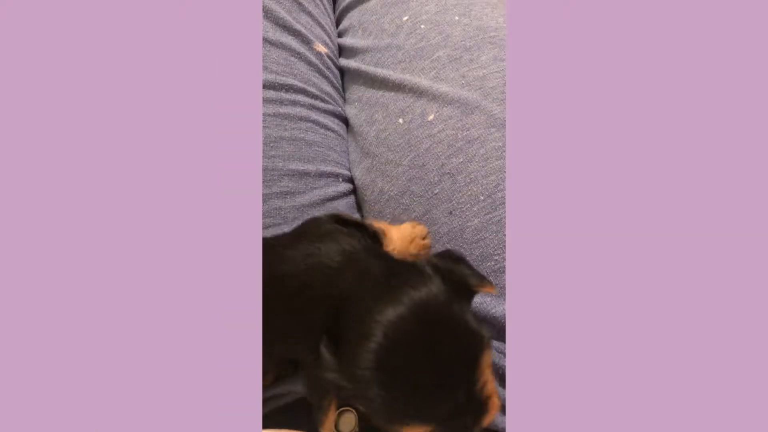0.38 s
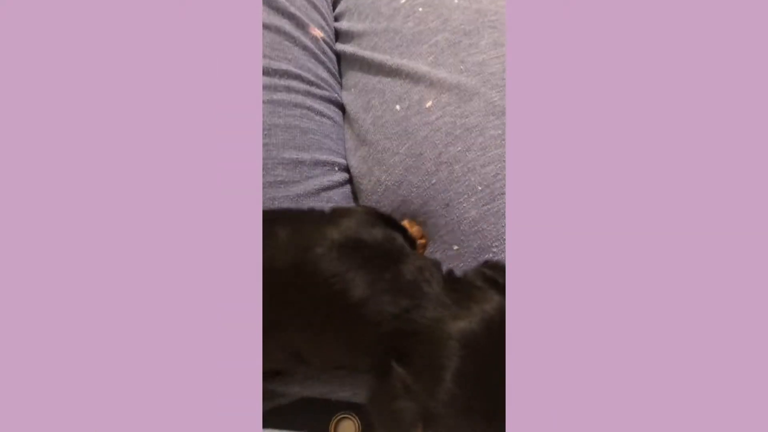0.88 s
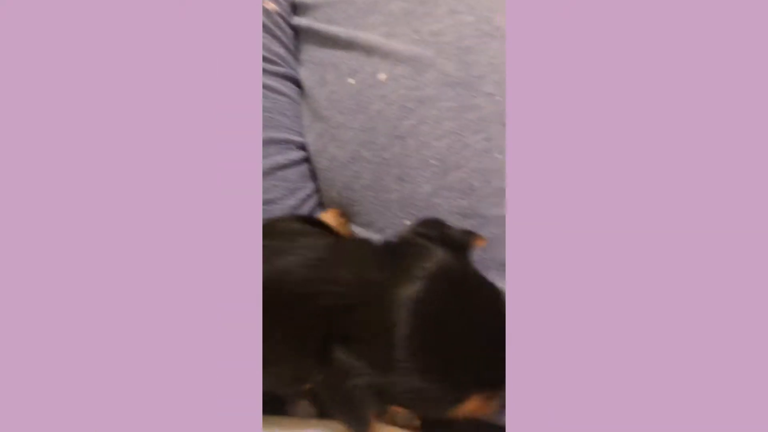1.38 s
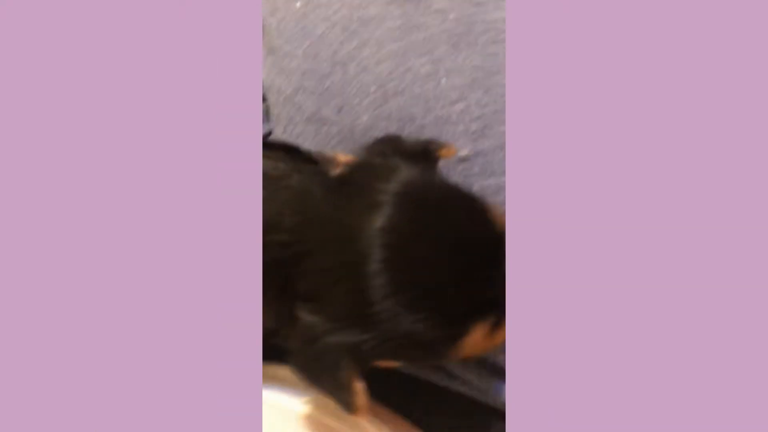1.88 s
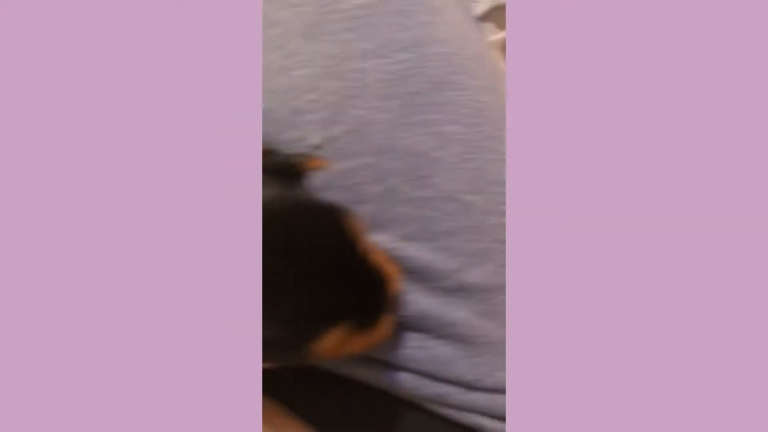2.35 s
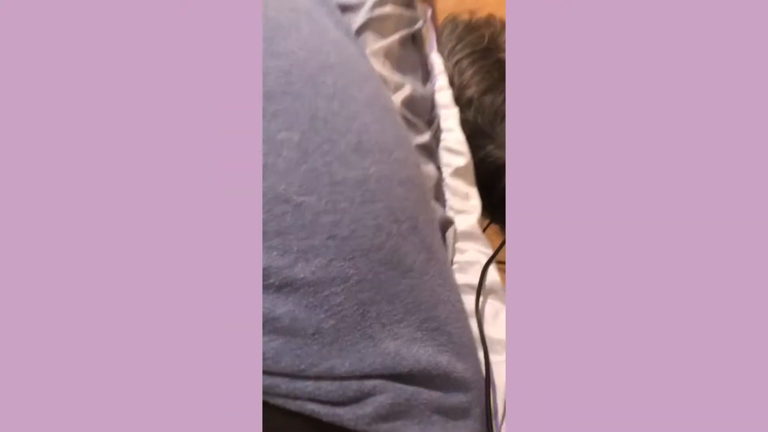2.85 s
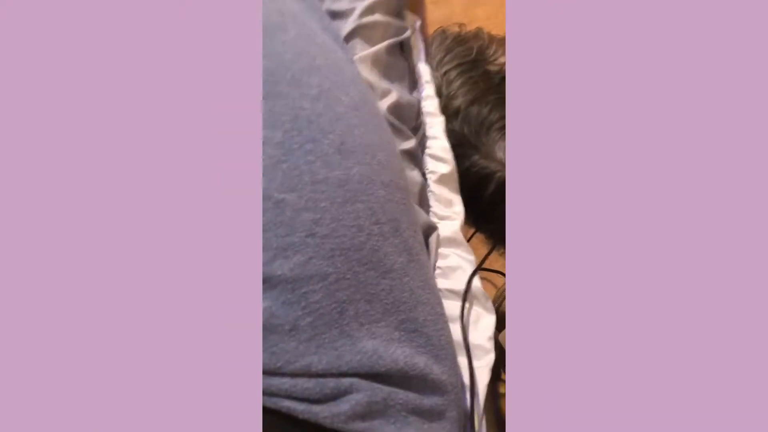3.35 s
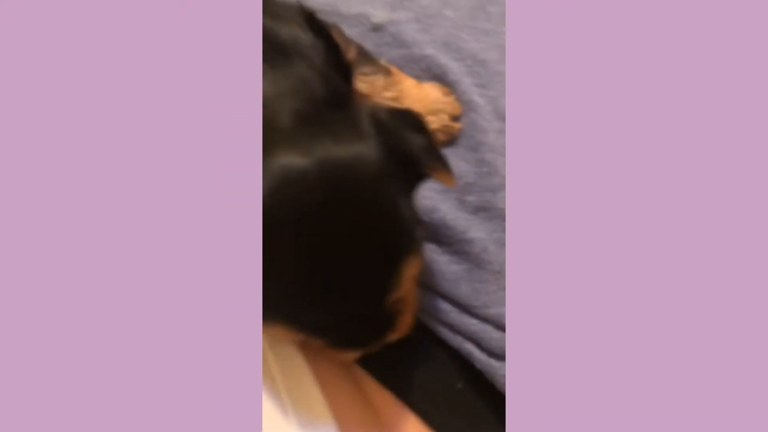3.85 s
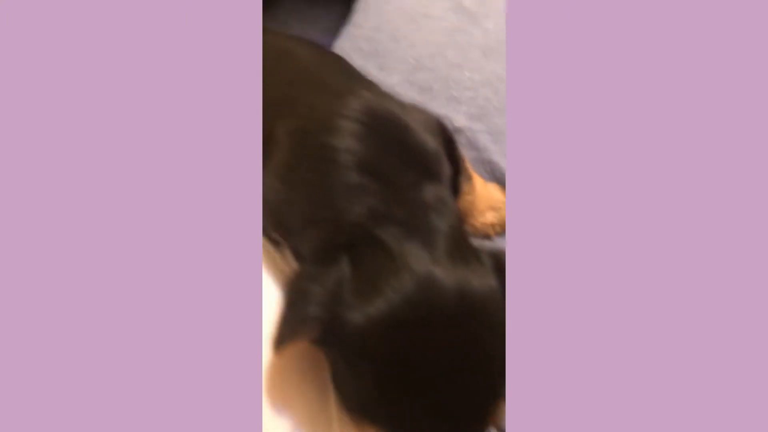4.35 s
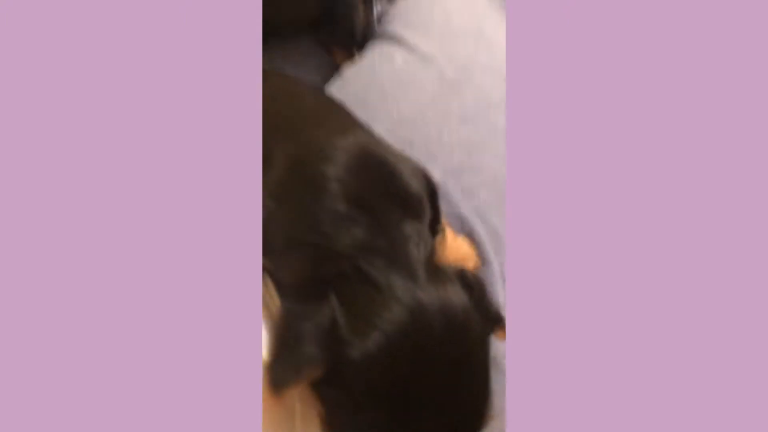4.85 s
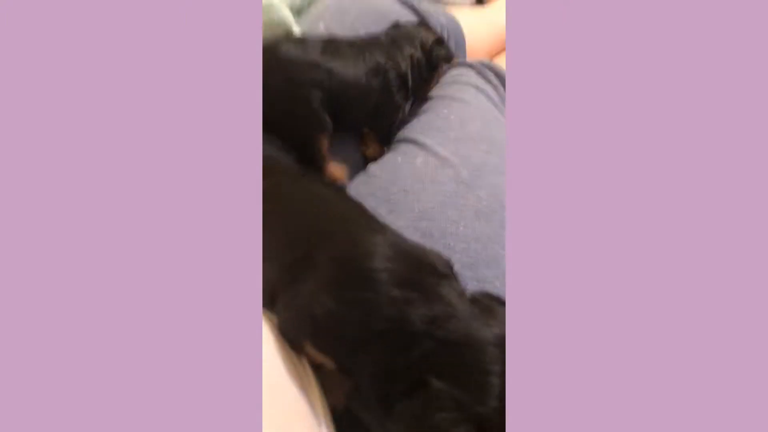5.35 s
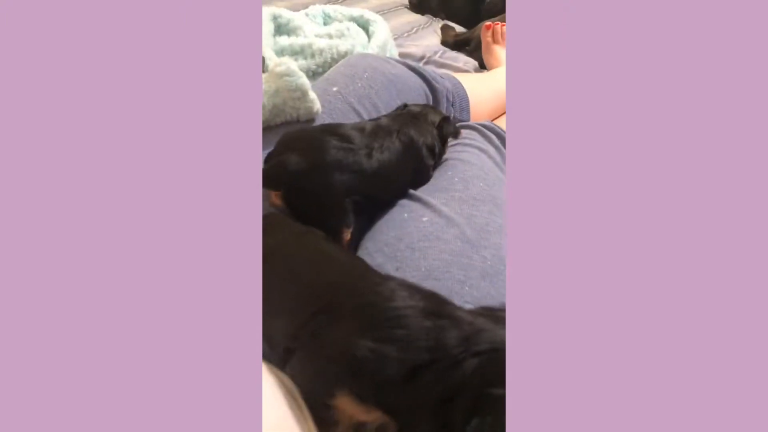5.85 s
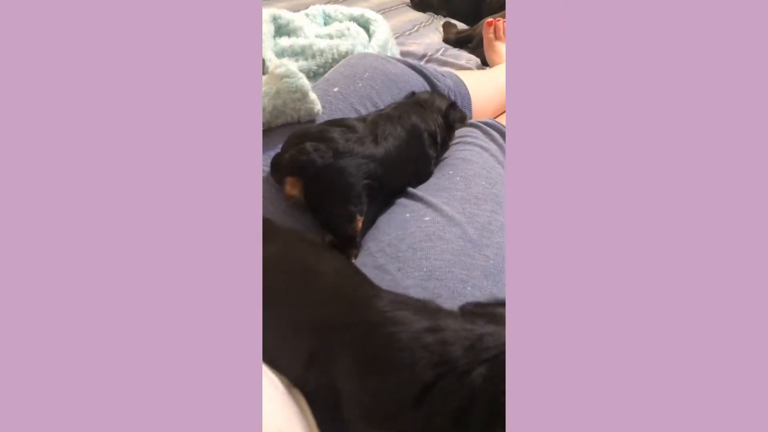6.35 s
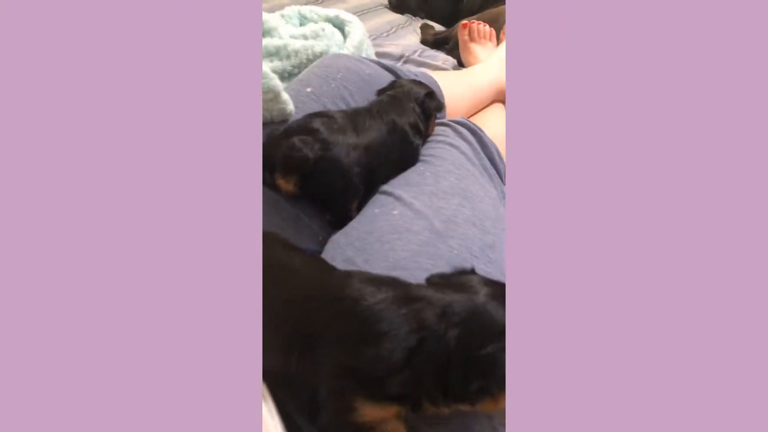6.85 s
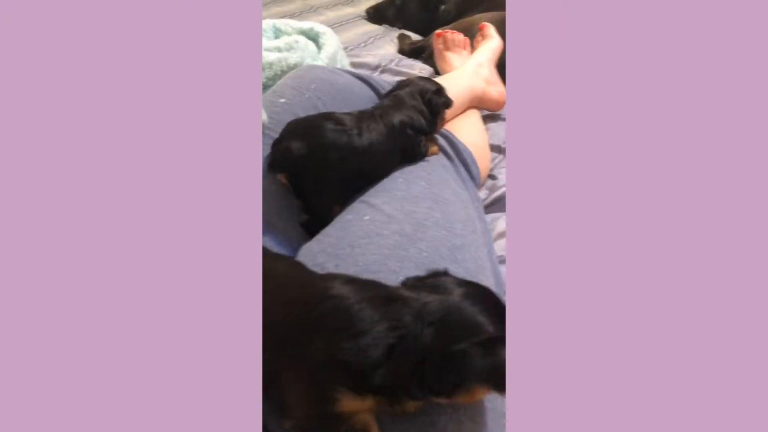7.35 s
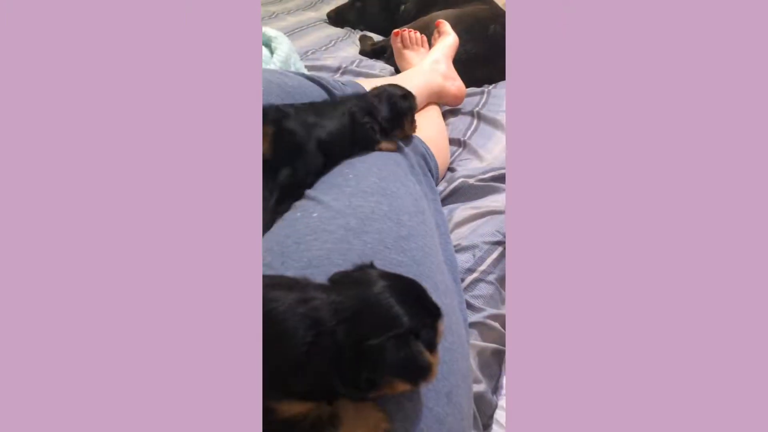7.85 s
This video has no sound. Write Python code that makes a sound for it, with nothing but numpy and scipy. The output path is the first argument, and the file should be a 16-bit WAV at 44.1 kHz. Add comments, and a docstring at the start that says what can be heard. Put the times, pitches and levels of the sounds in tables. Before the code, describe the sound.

In a quiet bedroom, very close to the microphone, a newborn puppy makes short, clear, upward squeaks that get shorter and weaker and stop by about three seconds. Another puppy grunts with each breath, at first small and irregular, then a steady, stronger run of nasal, creaky grunts about three or four a second. Faint cloth rustles, small ticks and a low appliance hum sit beneath.

```python
"""Newborn puppies on a lap

Two puppies in a quiet bedroom, close to the microphone. One grunts with each breath: uneven runs of
throat pulses, with resonant noise for the air in its nose. The other squeaks in clear, mostly rising
harmonic notes. Short gliding tones whistle, shaped noise rustles and ticks like cloth and claws,
and an appliance hums in steady tones over the hiss of the room."""
import sys
import numpy as np
from scipy import signal
from scipy.fft import rfft, irfft, next_fast_len
from scipy.io import wavfile
from scipy.ndimage import map_coordinates

SR = 44100
rng = np.random.default_rng(int(sys.argv[2]) if len(sys.argv) > 2 else 0)


def master(y):
    """Save y as 16-bit WAV."""
    cut = np.clip(np.atleast_2d(y).T, -1, 1)
    pcm = np.round(cut * 32767)  # scale
    wavfile.write(sys.argv[1], SR, pcm.astype(np.int16))


def attenuation_scalar(level_db):
    """Turn a level in dB into a linear amplitude multiplier (20 dB per decade)."""
    decades = np.asarray(level_db, float) / 20
    return 10 ** decades


N = 351477  # length in samples


def unit(x):
    """Scaled to rms 1."""
    return x / np.sqrt(np.mean(x ** 2) + 1e-20)


def along(points, hz):
    """Reads (Hz, value) points on a log frequency axis."""
    f, v = np.transpose(points)
    return np.interp(np.log(hz + 1), np.log(f + 1), v)


def curve(rows):
    """Joins (seconds, value) rows by straight lines, one value per sample."""
    return np.interp(np.arange(N) / SR, *np.transpose(rows))


def wobble(rate, size=N):
    """A smooth random curve with this many random knots a second."""
    knots = rng.standard_normal(int(size * rate / SR) + 4)
    return map_coordinates(knots, [np.arange(size) * rate / SR])


def filtered(x, response):
    """Multiplies the spectrum of x by a response, given as a function of frequency."""
    m = next_fast_len(N + 8192)
    return irfft(rfft(x, m) * response(np.fft.rfftfreq(m, 1 / SR)), m)[:N]


def hiss(spectrum):
    """Coloured noise of rms 1."""
    return unit(filtered(rng.standard_normal(N), lambda hz: attenuation_scalar(along(spectrum, hz))))


# The grunts. Each row: first surge in seconds, main surge in seconds, end in seconds, pulse peak in dB,
# pulse rate in Hz, first surge over main surge in dB, tremble depth in dB.
# Effort trembles, and the gap between the two surges sets its period.
GRUNTS = [ (.266, 0.264, .288, -33, 282, 4, 2.5), (0.683, 0.68, .688, -37.5, 337, -2, 0.5),
          (0.868, .882, .913, -28.5, 206.4, -4, 1), (1.024, 1.022, 1.033, -35, 320, 2, 2),
          (1.09, 1.147, 1.156, -31, 345, -3.5, 1), (1.346, 1.385, 1.389, -27.5, 338, -0.5, 2),
          (1.573, 1.601, 1.652, -25, 288.4, -15, 6), (1.824, 1.851, 1.9, -23, 300, -16.5, 5.5),
          (2.0611, 2.099, 2.138, -25, 287, -12, 8), (2.337, 2.36, 2.389, -29, 229.4, 3, 5),
          (2.577, 2.603, 2.63, -30.5, 316.6, 4.5, 22), (2.832, 2.861, 2.884, -28, 285, 1.5, 4),
          (3.093, 3.096, 3.104, -41, 344, 1.5, 0.5), (3.351, 3.348, 3.354, -47, 300, 5.5, 1.5),
          (3.502, 3.537, 3.574, -27, 360.4, -4.5, 3.5), (3.7341, 3.767, 3.848, -24.5, 320.6, -6.5, 16.5),
          (4.0185, 4.047, 4.101, -22.5, 391.4, -11, 14.5), (4.285, 4.319, 4.378, -21.5, 472, -7.5, 15.5),
          (4.5592, 4.589, 4.664, -25, 346.6, -8.5, 7), (4.851, 4.88, 4.936, -22, 592.4, 0, 5.5),
          (5.169, 5.205, 5.234, -28, 266.5, 0.5, 21.5), (5.442, 5.474, 5.524, -27, 342.8, 2, 12),
          (5.725, 5.756, 5.8, -25, 406, -1, 8), (6.008, 6.044, 6.1, -25.5, 420, -1.1, 13),
          (6.306, 6.339, 6.403, -26, 469.6, -1.5, 13.5), (6.632, 6.629, 6.653, -42, 266, 3.5, -1.5),
          (6.856, 6.883, 6.903, -29, 266, 0, 3), (7.076, 7.104, 7.128, -29.5, 261, -9, 30.5),
          (7.326, 7.356, 7.382, -26.5, 337, -6, 7), (7.565, 7.608, 7.643, -27, 449, -8.5, 2),
          (7.838, 7.864, 7.9, -30, 300, -2.5, 25.5), ]
# Faint mouth clicks, mostly just ahead of a grunt, each played as one lone pulse. Each row: time in seconds,
# peak in dB.
CLICKS = [(2.235, -53.5), (4.818, -41), (5.41, -44), (5.692, -44), (5.979, -51.5), (6.273, -51),
          (6.99, -52)]
# Colour of one throat pulse: mouth open towards the microphone, open and turned away, and shut.
# Each row: frequency in Hz, relative level in dB.
TOWARDS = [(220, -13), (400, -6.5), (1000, 0), (1350, -6), (1750, -28), (2200, -21), (2650, -17),
           (3150, -27), (3700, -40), (4500, -52), (6000, -75)]
AWAY = [(220, -16.5), (450, -4.5), (1150, 2.5), (1900, -14), (2500, -22.5), (3300, -35), (4300, -46),
        (6000, -75)]
SHUT = [(220, -11.5), (400, 12), (900, -11.5), (1700, -14.5), (3000, -25), (5000, -58)]
# How strongly the breath reaches the microphone as the head turns. Each row: time in seconds, level in dB.
FACING = [(1.1, -61), (1.4, -53), (2.6, -52.5), (3.6, -55), (4.6, -53.5), (5.3, -60.5), (6.5, -73),
          (7.6, -58)]
LEAD_S = .0115  # voicing starts this long before the first surge


def grunts():
    """One pulse per closing of the vocal folds; the mouth shuts as each grunt ends."""
    pulses, shut, air = np.zeros(N), np.zeros(N), np.zeros(N)
    for row in GRUNTS:
        first = round((row[0] - LEAD_S) * SR)
        rate, db = grunt_shape(*row)
        cycles = np.cumsum(rate) / SR
        cycles -= cycles[round(LEAD_S * SR)] % 1  # one pulse is due on the first surge
        # uneven folds: each pulse comes a little early and at its own size in dB
        early, size = rng.standard_normal((99, 2))[:int(cycles[-1]) + 1].T
        at = np.searchsorted(cycles, np.arange(len(size)) - .03 * np.abs(early))
        pulses[first + at] = attenuation_scalar(db[at] + size) * (at > 0)
        left_s = np.arange(len(db))[::-1] / SR
        shut[first:first + len(db)] = np.clip(1.25 - left_s / 0.035, 0, 1)
        air[first:first + len(db)] = .4 * attenuation_scalar(.5 * (db + 25))
        # air still flows after the voice
        tail = np.exp(-np.arange(round(.05 * SR)) / (.02 * SR))
        air[first + len(db):][:len(tail)] = 0.34 * tail[:N - first - len(db)]
    for s, db in CLICKS:
        pulses[round(s * SR)] = attenuation_scalar(db)

    away = curve([(5.0, 0), (5.3, 1)])  # the head turns between these seconds
    opened = pulses * (1 - shut)
    voice = throat(opened * (1 - away), TOWARDS, 0.0017)
    voice += throat(opened * away, AWAY, 0.002)
    voice += attenuation_scalar(-4.5) * throat(pulses * shut, SHUT, 0.0012)

    # a short puff of air runs just ahead of each pulse
    puffs = np.convolve(12 * pulses, np.hanning(round(.0015 * SR)))[round(.002 * SR):]
    breath = unit(filtered(rng.standard_normal(N), nose))
    return voice + attenuation_scalar(curve(FACING)) * (air + np.resize(puffs, N)) * breath


def grunt_shape(surge, main, end, db, hz, surge_db, tremble_db):
    """Pulse rate and size per sample: effort builds, trembles and fades, and the rate follows it."""
    build_share = .75  # effort is full after this share of the way to the main surge
    onset_db = 15.5  # how far below the first surge the voicing starts
    fade_db, fade_bend = 11, 1.8  # loss by the end, and how late it comes
    later_tremble_db, tremble_dies_s = 6, .06  # depth limit and decay time after the main surge
    build_halving_db, tremble_halving_db = 7, 9  # the rate halves for each so many dB of lost effort
    rest_hz = 300  # the rate slides towards this as a grunt fades

    t = surge - LEAD_S + np.arange(round((end - surge + LEAD_S) * SR)) / SR
    build = np.interp(t, [surge, surge + build_share * (main - surge)], [surge_db, 0])
    onset = -onset_db * np.clip((surge - t) / LEAD_S, 0, 1) ** 2
    fading = np.clip((t - main) / (end - main), 0, 1)
    fade = -fade_db * fading ** fade_bend
    swing = (1 - np.cos(2 * np.pi * (t - main) / (main - surge))) / 2
    later_db = later_tremble_db * np.tanh(tremble_db / later_tremble_db)
    depth_db = np.where(t < main, tremble_db, later_db)
    tremble = -depth_db * swing * np.exp(-np.maximum(t - main, 0) / tremble_dies_s)
    rate = hz * 2 ** (build / build_halving_db + tremble * swing ** .4 / tremble_halving_db)
    rate = rate * (rest_hz / hz) ** fading
    # size holds through a surge and dips between
    return rate, db + build + onset + tremble * swing ** 1.06 + fade


def throat(pulses, colour, lag_s):
    """Each pulse slides down in pitch: 500 Hz arrives lag_s after 1 kHz; a pulse of 1 peaks at 1."""
    def slide(f):
        return 2 * np.pi * lag_s * (1000 * np.log(np.maximum(f, 250)) - f)

    def response(f):
        size = attenuation_scalar(along([(20, -80)] + colour + [(20000, -90)], f))
        return -size * np.exp(-1j * (slide(f) - slide(1000)))

    one_pulse = irfft(response(np.fft.rfftfreq(4096, 1 / SR)))
    return filtered(pulses, response) / np.abs(one_pulse).max()


# Resonances the breath hisses in. Each row: centre in Hz, width of one filter pass in Hz, relative level in dB.
NOSE = [(2550, 800, 5), (8300, 1500, 1), (13300, 3200, 1.5)]


def nose(f):
    """Air cavities ring at their own frequencies: a sum of band-pass resonances, each passed twice."""
    return sum(attenuation_scalar(db) * (1j * f * w / (c * c - f * f + 1j * f * w)) ** 2 for c, w, db in NOSE)


# The squeaks. Each row: start in seconds, voice break in seconds, end in seconds, low pitch in Hz,
# high pitch in Hz, level in dB before the mouth colours it, second harmonic over that level in dB.
SQUEAKS = [(0.208, 0.24, .339, 1355, 1641, -33.5, -9.5), (0.477, 0.519, .603, 1155, 1513, -34.5, 2),
           (0.744, 0.79, .853, 1073, 1413, -35, 0.5), (1.005, 1.043, 1.061, 998, 1282, -34.5, -1.5),
           (1.224, 1.237, 1.25, 952, 1119, -36.5, -9.5), (1.449, 1.46, 1.47, 770, 964, -40, -8),
           (1.661, 1.673, 1.683, 1104, 1245, -39.5, -9.5), (2.066, 2.074, 2.094, 1020, 1099, -39.5, -10),
           (2.311, 2.322, 2.336, 924, 1073, -41.5, -11), (2.48, 2.512, 2.528, 748, 793, -39.5, -0.5),
           (2.928, 2.932, 2.946, 694, 682, -45.5, -4), (6.727, 6.749, 6.8, 1055, 1190, -60, -2)]
# Third and higher harmonics. Each row: frequency in Hz, relative level in dB.
OVERTONES = [(3000, 16), (4600, -15), (5900, -21), (7900, 5), (9500, -16), (12500, 3), (15800, -14)]
# The high harmonics fade as the squeaks grow weaker. Each row: time in seconds, level in dB.
SHRILL = [(.27, -51.5), (.55, -60.5), (.8, -57.5), (1.03, -68.5), (1.25, -80), (1.5, -71), (2.5, -79.5),
          (2.9, -92)]


def squeaks():
    """Clear harmonic notes with a slight tremble; a puff of air follows each one."""
    top_hz = 15800  # no higher harmonics than this
    voice, puffs = np.zeros(N), np.zeros(N)
    for row in SQUEAKS:
        first = round(row[0] * SR)
        hz, first_db, second_db = squeak_shape(*row)
        turn = 2 * np.pi * np.cumsum(hz * (1 + 0.007 * wobble(171.4, size=len(hz)))) / SR
        order = np.arange(3, 15)[:, None]
        scatter_db = rng.normal(0, 3, order.shape)
        flutter_db = 3 * np.array([wobble(40, size=len(hz)) for _ in order])
        upper = attenuation_scalar(along(OVERTONES, order * hz) + scatter_db + flutter_db)
        upper = upper * (order * hz < top_hz) * np.sin(order * turn)
        # the high harmonics swell after the start and die before the end
        shrill = attenuation_scalar(curve(SHRILL)[first] + 0.083 * (second_db - second_db.max()))
        shrill *= np.sin(np.linspace(.25, np.pi, len(hz)))
        note = attenuation_scalar(first_db) * np.sin(turn) + attenuation_scalar(second_db) * np.sin(2 * turn + 1)
        note += shrill * upper.sum(0)
        # soft edges avoid clicks
        edge = np.minimum(np.arange(len(hz)), np.arange(len(hz))[::-1]) / (0.00075 * SR)
        voice[first:first + len(hz)] += np.sqrt(2) * note * np.minimum(edge, 1)
        puff = np.hanning(round(0.02 * SR))
        puffs[first + len(hz) - 200:][:len(puff)] += attenuation_scalar(curve(SHRILL)[first] + 6.5) * puff
    return voice + puffs * hiss(CLOTH)  # the puffs share the colour of the cloth


# What the mouth does to the two lowest harmonics. Each row: frequency in Hz, gain in dB.
MOUTH = [(700, 0.5), (1020, 0.5), (1210, -.5), (1410, -9.5), (1560, -3), (2050, -8), (2420, 1),
         (2850, -3.5), (3300, -10)]


def squeak_shape(start, jump, end, low_hz, high_hz, db, second_db):
    """Pitch and the levels of the two lowest harmonics, set by the folds and coloured by the mouth."""
    # pitch rises evenly, but this share of the rise comes as a jump where the voice breaks
    jump_share, jump_s = .45, 0.012
    # pitch starts sharp, flicks up before the end and drops as the folds let go (share of pitch, seconds)
    sharp, sharp_s = 0.096, 0.0018
    flick, flick_s = 0.067, 0.0047
    drop, drop_s = 0.39, 0.0093
    attack_db, attack_s = 2.7, 0.0057  # quieter by this much at the start
    release_db, release_s = 3.9, 0.0054  # and at the end
    pop_db, second_dies_db = 1.5, 15  # letting go swells the fundamental once, fades the second harmonic

    t = np.arange(round((end - start) * SR)) / SR
    left = t[::-1]
    step = np.tanh((start + t - jump) / jump_s) / 2 + .5
    even = np.minimum(t / (end - start - drop_s), 1)
    hz = low_hz + (high_hz - low_hz) * (jump_share * step + (1 - jump_share) * even)
    letting_go = np.clip(1 - left / drop_s, 0, 1)
    flick_up = flick * np.clip(1 - (left - drop_s) / flick_s, 0, 1)
    hz = hz * (1 + sharp * np.exp(-t / sharp_s) + flick_up - drop * letting_go)
    db = db - attack_db * np.exp(-t / attack_s) - release_db * np.exp(-left / release_s)
    first = db + along(MOUTH, hz) + pop_db * np.sin(np.pi * letting_go)
    second = db + second_db + along(MOUTH, 2 * hz) - second_dies_db * letting_go
    return hz, first, second


# Thin falling whistles as air is drawn in. Each entry: start in seconds.
WHISTLES = [4.378, 5.522, 5.809, 6.108, 6.42, 7.136]


def whistles():
    """A narrow nostril whistles briefly: an unsteady sine that falls in pitch."""
    out, t = np.zeros(N), np.arange(round(0.021 * SR)) / SR
    for s in WHISTLES:
        hz = (10100 - 65000 * t) * (1 + 0.033 * wobble(320, size=len(t)))
        tone = np.sin(2 * np.pi * np.cumsum(hz) / SR)
        out[round(s * SR):][:len(t)] += attenuation_scalar(-62.5) * np.hanning(len(t)) * tone
    return out


# Cloth rustle. Each row: time in seconds, level in dB before the grain is added.
RUSTLE = [(.9, -81), (1.1, -60.5), (1.4, -69.5), (4.6, -84), (6.48, -87), (6.58, -60.5), (6.9, -64),
          (7.05, -74), (7.38, -60), (7.5, -78)]
# Colour of the rustle. Each row: frequency in Hz, relative level in dB per Hz.
CLOTH = [(300, -14.5), (2000, -14.5), (6000, -19), (15000, -24)]
# Ticks of claws and cloth. Each row: time in seconds, peak in dB.
TICKS = [(1.1523, -39), (1.1887, -42), (1.1954, -42), (3.0654, -49), (4.2587, -37), (4.4603, -46),
         (4.4727, -44)]


def cloth():
    """Rubbing cloth is noise with a grainy level; each tick is a burst of noise that dies fast."""
    grain_db = 1.5 * wobble(40) + 2 * wobble(300)
    out = attenuation_scalar(curve(RUSTLE) + grain_db) * hiss(CLOTH)
    t = np.arange(round(.004 * SR)) / SR
    for s, db in TICKS:
        crack = rng.standard_normal(len(t)) * attenuation_scalar(-60 * t / .005)
        out[round(s * SR):][:len(t)] += attenuation_scalar(db) * crack / np.abs(crack).max()
    return out


# Hum tones of the appliance. Each row: frequency in Hz, rms level in dB around which it wavers.
HUM = [(120, -62.5), (480, -73), (586, -77.5)]
# Colour of the broad noise. Each row: frequency in Hz, relative level in dB per Hz.
AIR = [(25, -61), (45, 3), (90, -2.5), (200, -10), (450, -11.5), (900, -22.5), (2500, -28.5),
       (15000, -38.5)]


def appliance():
    """Hum tones that waver a little in level and phase, over broad noise."""
    t = np.arange(N) / SR
    lines = np.zeros(N)
    for hz, db in HUM:
        level = np.sqrt(2) * attenuation_scalar(db + 0.58 * wobble(3.8))
        lines += level * np.sin(2 * np.pi * hz * t + 0.97 * wobble(2.5))
    return lines + attenuation_scalar(-58 + 1.4 * wobble(1.094)) * hiss(AIR)


# The room's decay. Each row: frequency in Hz, time to fall by 60 dB in seconds.
WALLS = [(400, 0.2), (2000, 0.25), (12000, 0.25)]


def room(x):
    """Echoes blur into decaying noise; each frequency dies at its own speed."""
    hz, t, z = signal.stft(rng.standard_normal(SR // 2), SR, nperseg=256)
    decay = attenuation_scalar(-60 * t / along(WALLS, hz)[:, None])
    tail = signal.istft(z * decay, SR, nperseg=256)[1]
    late = np.pad(x, (round(.004 * SR), 0))
    return signal.fftconvolve(late, tail / np.linalg.norm(tail))[:N]


def scene():
    """Adds up all sources; the squeaking puppy fills more of the room than the one by the microphone."""
    high, low = squeaks(), grunts()
    echoes = attenuation_scalar(-12.0) * room(high) + attenuation_scalar(-15.5) * room(low)
    return (high + low + echoes + whistles() + cloth() + appliance())[None]


def low_pass(x):
    """Removes everything above the highest recorded frequency."""
    return signal.sosfilt(signal.butter(12, 16500, fs=SR, output="sos"), x)


def record(dry):
    """The sound fades in after a moment of silence."""
    start_s, fade_s = 0.17, 0.031
    fade = np.clip((np.arange(N) / SR - start_s) / fade_s, 0, 1)
    return low_pass(dry * fade)


dry = scene()
out = record(dry)
master(out)
```